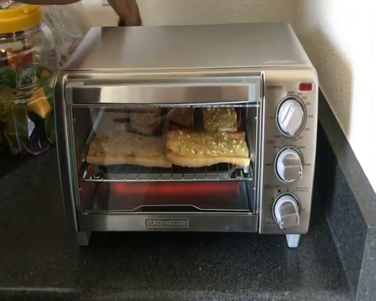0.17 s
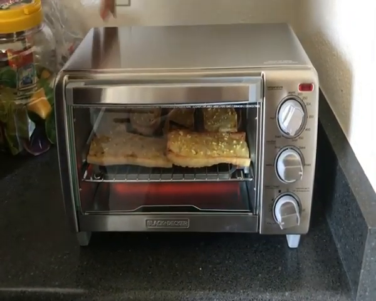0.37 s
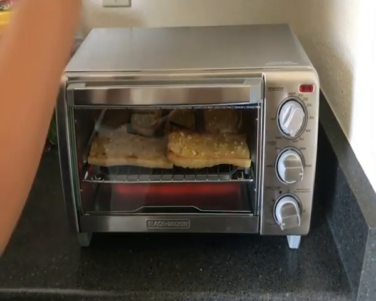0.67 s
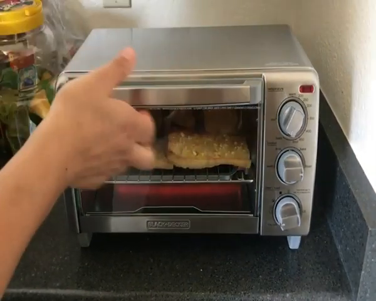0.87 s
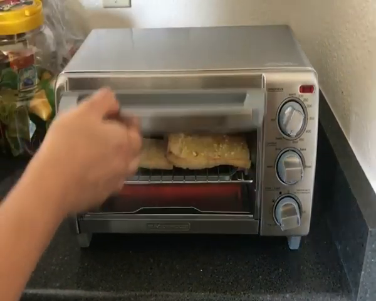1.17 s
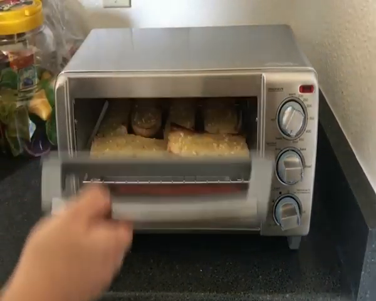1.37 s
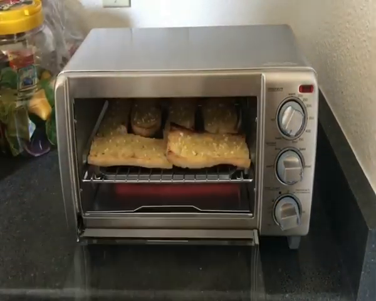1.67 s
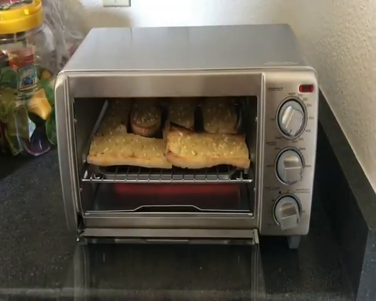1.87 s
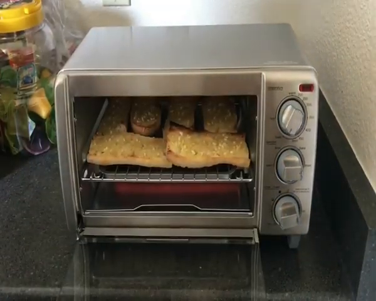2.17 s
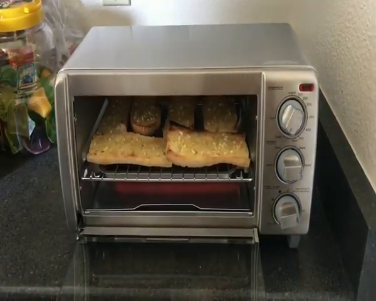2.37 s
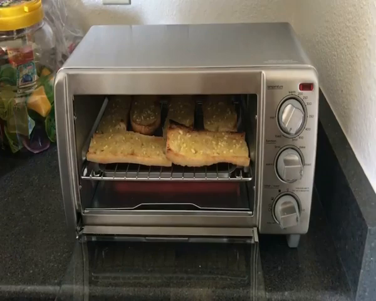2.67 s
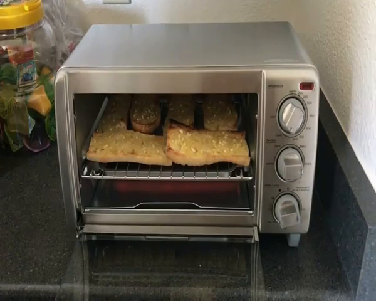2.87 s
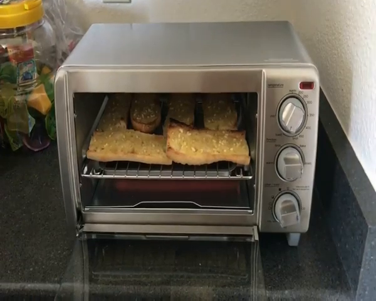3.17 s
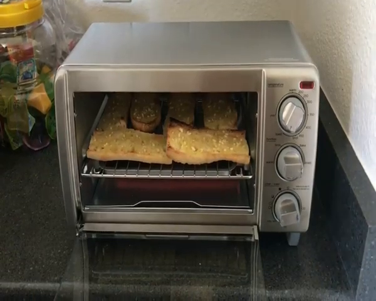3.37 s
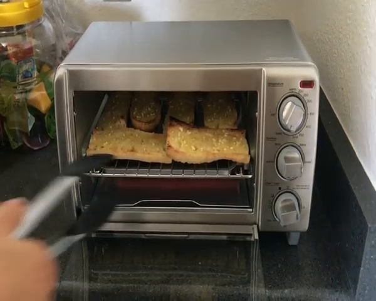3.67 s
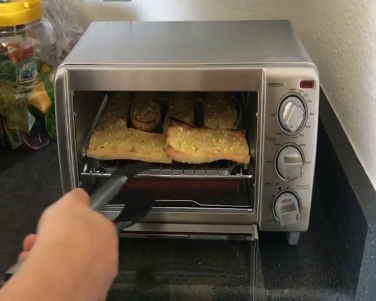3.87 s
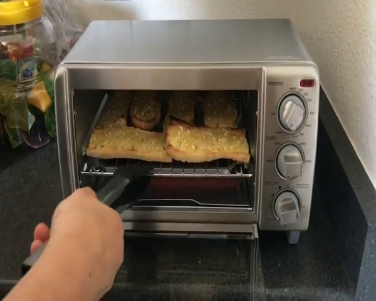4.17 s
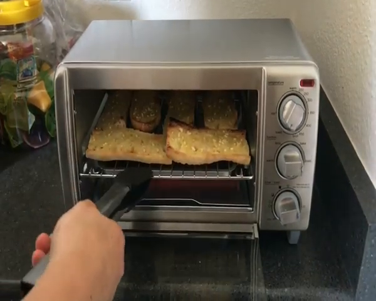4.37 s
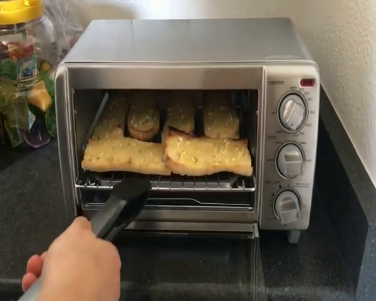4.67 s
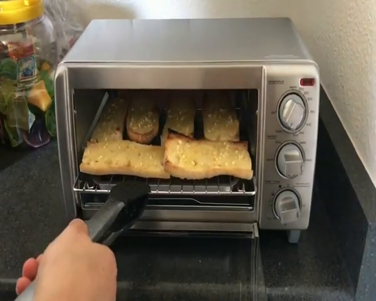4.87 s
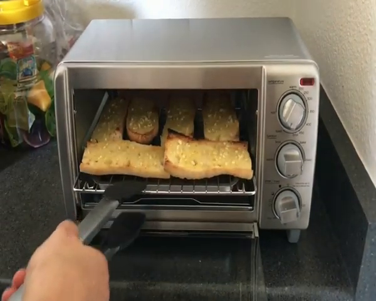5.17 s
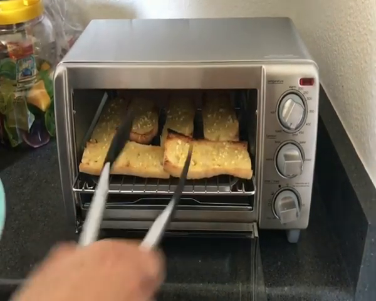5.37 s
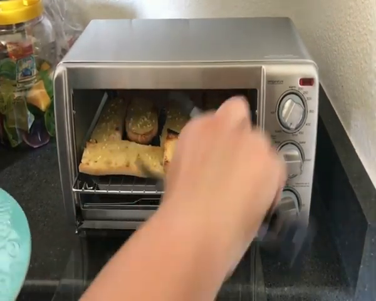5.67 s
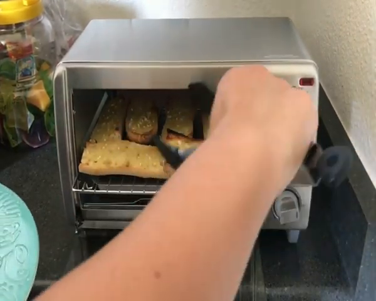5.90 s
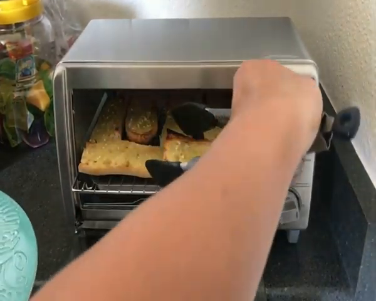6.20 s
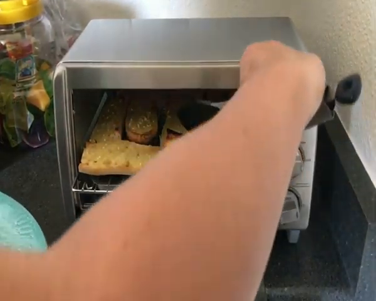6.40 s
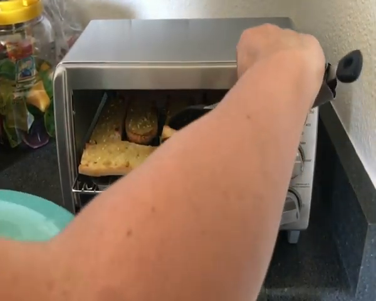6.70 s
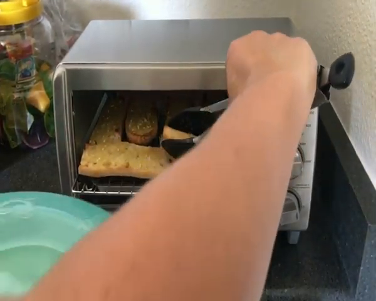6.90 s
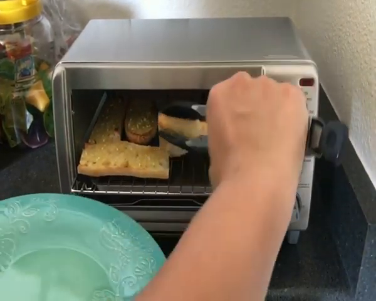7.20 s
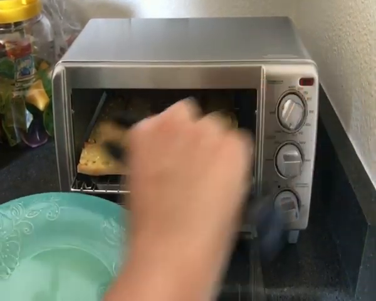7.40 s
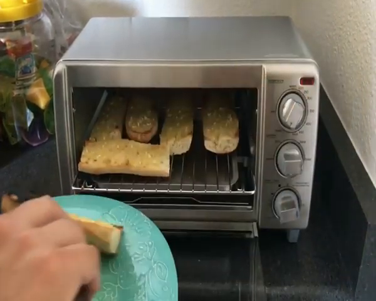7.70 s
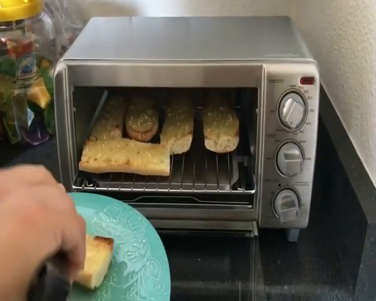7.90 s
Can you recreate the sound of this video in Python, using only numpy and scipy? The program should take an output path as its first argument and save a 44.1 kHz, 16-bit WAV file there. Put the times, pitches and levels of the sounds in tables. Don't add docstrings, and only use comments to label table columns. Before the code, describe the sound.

A loud plug clack on sheet metal, a rattling oven door drop, plate clatter, then tongs scraping a squealing wire rack over a fridge drone.

```python
import sys
import numpy as np
from scipy import signal
from scipy.fft import rfft, irfft, next_fast_len
from scipy.io import wavfile
from scipy.ndimage import uniform_filter1d, map_coordinates

SR = 44100
rng = np.random.default_rng(int(sys.argv[2]) if len(sys.argv) > 2 else 0)


def level_to_linear(level):
    exponent = np.asarray(level, float) / 20
    return 10 ** exponent


def int16_out(signal):
    q = np.round(np.clip(np.atleast_2d(signal).T, -1, 1) * 32767)
    wavfile.write(sys.argv[1], SR, q.astype(np.int16))


N = 354828
SIZE = 2 ** 15


def unit(x):
    return x / np.sqrt(np.mean(x ** 2) + 1e-20)


def along(points, hz):
    f, v = np.transpose(points)
    return np.interp(np.log(hz + 1), np.log(f + 1), v)


def wobble(rate_hz):
    return map_coordinates(rng.standard_normal(int(N * rate_hz / SR) + 4), [np.arange(N) * rate_hz / SR])


def coloured(x, gain):
    m = next_fast_len(N + 8192)
    return unit(irfft(rfft(x, m) * gain(np.fft.rfftfreq(m, 1 / SR)), m)[:N])


def noise_like(x, colour):
    return coloured(x, lambda hz: level_to_linear(along(colour, hz)))


def causal(level_db):
    cep = irfft(np.log(level_to_linear(level_db) + 1e-6))
    cep[1:len(cep) // 2] *= 2
    cep[len(cep) // 2 + 1:] = 0
    return np.exp(rfft(cep))


def phase_walk(t, speed):
    steps = rng.standard_normal(len(t) // 64)
    return np.interp(t, t[::64], speed * np.sqrt(64 / SR) * np.cumsum(steps))


def swells(rows, grows):
    t = np.arange(0, N, 128) / SR
    gains = 0
    for s, rise, fall, db in rows:
        speed = np.interp(t, [s - abs(rise), s, s + abs(fall)], [0, 1, 0])
        gains = gains + level_to_linear(db) * speed ** grows
    return np.interp(np.arange(N) / SR, t, gains)


# f/Hz, t60/s
KITCHEN = [(150, 0.36), (1200, 0.29), (3500, 0.24), (8000, 0.21), (15000, 0.086)]


def echo():
    hz, t, z = signal.stft(rng.standard_normal(SIZE // 2), SR, nperseg=256)
    tail = signal.istft(z * level_to_linear(-60 * t / along(KITCHEN, hz)[:, None]), SR, nperseg=256)[1]
    return rfft(np.pad(tail / np.linalg.norm(tail), (200, 0)), SIZE)


def struck(events, colour, modes, usual_db, gain_db, ring_db, room_db):
    out, t, hz = np.zeros(N + SIZE), np.arange(SIZE // 2) / SR, np.fft.rfftfreq(SIZE, 1 / SR)
    for s, db, treble_db, t60, own_db in events:
        tilt = 0.44 * (treble_db - usual_db) * np.log2(1 + (hz / 2500) ** 2)
        chatter = level_to_linear(-60 * t / max(t60, .002)) * rng.standard_normal(len(t))
        chatter *= (1 - np.exp(-t / 0.00096)) * (0.19 + rng.exponential(1, len(t)))
        chatter = rfft(chatter, SIZE)
        own = 10 * np.log10(np.abs(uniform_filter1d(np.abs(chatter) ** 2, size=400)) + 1e-9)
        blow = irfft(chatter * causal(along(colour, hz) + tilt - own + own.mean()))
        blow = blow / np.abs(blow).max()
        ring = np.zeros(len(t))
        for f, level, life in modes:
            fade = level_to_linear(level + rng.normal(0, 2.1) - 60 * t / life)
            ring += fade * np.sin(2 * np.pi * f * t + np.sqrt(f / 1000) * phase_walk(t, 6))
        blow[:len(t)] += level_to_linear(ring_db + own_db) * ring * (1 - np.exp(-t / 0.0023))
        walls = irfft(rfft(blow) * echo())
        out[round(s * SR):][:SIZE] += level_to_linear(db + gain_db) * (blow + level_to_linear(room_db) * walls)
    return out[:N]


CLACK = [
    (0.568, -20.5, -28, 0.029, -3),
    (0.5838, -0.95, -31, 0.0076, 8.5),
    (0.593, -9.5, -26, .005, 0),
    (0.5995, -8, -21, 0.02, -5),
    (0.6145, -8, -15, 0.0098, -6),
    (0.624, -16, -27, 0.01, -13),
    (0.638, -15.5, -29, 0.012, -5),
    (0.647, -20, -30, .015, -6),
    (0.839, -28.5, -43, 0.027, -1),
]
SNAP = [
    (.5675, -33, -4, 0.038, 0),
    (.5838, -28.5, -4.5, 0.055, 0),
    (.6002, -16, 1.5, .03, 0),
    (.6035, -21, 6.5, 0.062, 0),
]
CASE = [(50, -37), (95, -30), (135, -2), (200, -18), (294, 2.5), (450, -15.5), (667, -9.5), (1000, -2),
        (1400, -0.5), (1900, -5.5), (2400, -17.5), (4200, -26), (10300, -60), (15500, -56.5)]
CLACK_RING = [(129.4, -11.5, 0.2), (254, -15, 0.21), (299, -5, 0.13), (353, -9, 0.26), (560, -14, 0.27),
              (680, 0, 0.063), (729, -8, 0.21), (877, 2.5, 0.089), (965, 2, 0.074), (1031, -4, 0.062),
              (1334, -1.5, 0.17), (1369, 7, 0.067), (1735, -11, 0.06), (2100, -6, 0.05),
              (950, 1, 0.026), (1040, 4, 0.072), (1120, -4, 0.068), (1270, -6, 0.064), (1550, -4, 0.096),
             (1730, -9, 0.06), (1860, 2.5, 0.05), (2154, -7.5, 0.09), (2760, -23, 0.037)]
PRONG = [(1500, -34.5), (2300, -0.5), (2800, 1.5), (4000, -3), (6500, -9), (9500, -11), (10800, -22),
         (12500, -8), (15500, -18)]


def plug():
    body = struck(CLACK, CASE, CLACK_RING, usual_db=-10.5, gain_db=0.6, ring_db=-21.0, room_db=-12.5)
    return body + struck(SNAP, PRONG, [], usual_db=4.5, gain_db=2.0, ring_db=-30, room_db=-8.5)


DOOR = [(.0682, -41, -21, 0.041, 10), (1.3695, -51.5, -9.5, 0.02, -5), (1.5933, -50, -10, 0.0251, -4),
        (1.8507, -40, -16.5, .05, -6), (1.8954, -12, -15.5, 0.012, 2), (1.899, -20, -20, 0.02, -2),
        (1.9065, -25, -17.5, 0.013, -6), (1.9135, -28, -8, 0.015, -2), (1.921, -34, -10.5, .02, 0),
        (1.9555, -27, -2.5, 0.12, -3), (2.0225, -34.5, 4, 0.058, -8), (2.0482, -21, -15, 0.037, 10),
        (2.061, -37.5, -3, 0.024, -4), (2.1188, -30.5, -1, 0.071, -13), (2.2181, -44, 1.5, .04, -8)]
KNOCK = [
    (1.906, -23.5, -6, 0.011, -3),
    (1.913, -31, -10, 0.019, 0),
    (1.953, -26, -12, 0.017, 2),
    (1.967, -26, -10, 0.018, -1),
    (1.985, -34, -8, 0.026, -3),
    (2.062, -27, -10, 0.024, 1.5),
    (2.085, -35, -10, 0.027, -1),
    (2.114, -31, -10, 0.028, -5),
    (2.152, -29, -7, 0.021, 1),
    (2.175, -30.5, -9, 0.022, -6),
]
CREAK = [
    (.077, -37, -3, .03, 2.5),
    (1.6462, -48, -2, .02, -6),
    (1.732, -42.5, -5, 0.022, -6),
]
PIN = [
    (.0973, -34.5, -1, 0.037, -8),
    (2.1497, -32.5, -4, 0.024, -8),
    (6.6858, -40.5, -11, .02, -2),
    (6.7035, -37, -10, 0.03, 3),
]
GLASS = [(88, -13.5), (200, -8.5), (420, -19), (1200, -12), (1900, -14.5), (2600, -3), (3500, -5.5),
         (4700, -9.5), (5800, -3.5), (8000, -10.5), (15500, -23)]
GLASS_RING = [(251, -13.5, 0.138), (338, -10.5, 0.2), (400, -16, 0.15), (2450, 1, 0.02), (2940, -14, 0.025),
              (3160, -18.5, .03), (3400, -2.5, 0.021), (4380, -6, 0.025), (5490, -8, 0.03),
              (5850, -7, 0.045)]
STOP_RING = [(143, 0, 0.1), (246, -8, 0.13), (330, -17, 0.12), (403, -3, 0.15), (560, -18, .06),
             (750, 0, 0.047), (1230, -3.5, 0.045)]
SPRING_RING = [(2108, 0, 0.06), (2600, -3, 0.055), (2860, -11.5, 0.23), (3660, -8, 0.046)]
PIN_RING = [(2850, -1, 0.04), (3130, -10, 0.031), (3270, 7, 0.025), (3710, -4, 0.028)]
COUNTER = [(60, -39.5), (190, 15), (400, 1), (760, -5), (1100, -29), (1500, -28), (4000, -23), (9000, -53)]


def door():
    return (struck(DOOR, GLASS, GLASS_RING, usual_db=-15.5, gain_db=4.0, ring_db=-17.0, room_db=-8.5)
            + struck(KNOCK, COUNTER, STOP_RING, usual_db=2, gain_db=-8, ring_db=-4.5, room_db=-8.5)
            + struck(CREAK, GLASS, SPRING_RING, usual_db=4.0, gain_db=1.5, ring_db=-10.0, room_db=-5.5)
            + struck(PIN, GLASS, PIN_RING, usual_db=2.0, gain_db=2.5, ring_db=-4.0, room_db=-8))


PLATE = [
    (3.081, -35.5, -12, 0.055, -2.5),
    (7.8112, -36, -9.5, 0.028, 2),
    (7.9106, -44, -16, 0.011, 1),
    (7.9573, -45.5, -4, .02, -8),
    (7.9775, -19.5, -22, 0.011, -1),
    (8.0084, -36, -6, 0.0122, -16),
    (8.0394, -38, -6.5, .012, 2),
]
# t/s, peak level/dB
LIFT = [(2.798, -47), (2.8292, -38.5), (2.844, -37), (2.8578, -33), (2.8637, -30.5), (2.872, -32),
        (2.885, -39), (2.899, -40), (2.91, -46.5)]
CHINA = [(200, -12), (500, -10), (1000, -1), (1600, -2.5), (2500, -2.5), (3600, 0), (4400, -18), (5800, -7),
         (9000, -14), (15500, -34)]
CHINA_RING = [(736, -9, 0.25), (1090, -10.5, 0.094), (1500, 1, 0.047), (1910, -3.5, 0.11),
              (2350, -3, 0.064), (2870, -0.5, 0.037), (3670, 2, 0.04), (4500, -5, 0.04), (5360, -4, 0.037),
              (5900, -5.5, 0.062), (8240, -19, .03)]
STACK = [(240, -36.5), (400, -3), (700, -19), (1050, -20), (1500, -11), (2300, -7), (3500, -0.5),
         (4600, -11), (6500, 0), (15500, -44)]
STACK_RING = [(624, 3.5, 0.093), (750, 0.5, 0.091), (1024, -1, 0.15), (1468, 3, 0.05), (1774, -1.5, 0.064),
              (2343, -2.5, 0.047), (4400, -5, 0.042), (5260, -5, 0.057), (5900, -7, .03), (6940, -12, .03)]


def plate():
    lift = [(s, db, -12.5, 0.027, 0) for s, db in LIFT]
    taps = struck(PLATE, CHINA, CHINA_RING, usual_db=-18.0, gain_db=-2.5, ring_db=-11.0, room_db=-9.0)
    return taps + struck(lift, STACK, STACK_RING, usual_db=-6.5, gain_db=-4.5, ring_db=-7.0, room_db=-9.5)


THUD = [
    (3.126, -33.5, -8, 0.047, 5),
    (4.378, -34.5, -13, 0.025, -2),
    (6.735, -34.5, -22, 0.047, -1.5),
    (6.776, -39.5, -18, 0.054, -10),
]
COUNTER_RING = [(223, -6, 0.051), (303, -7, 0.11), (405, 0, 0.082), (573, -4, 0.05), (756, 4.5, 0.1),
                (1105, -12.5, 0.19)]


def thuds():
    return struck(THUD, COUNTER, COUNTER_RING, usual_db=-1.5, gain_db=2.0, ring_db=-8.5, room_db=-3.5)


TONGS = [
    (3.7073, -44.5, -14, .023, -2),
    (3.7675, -42, -11, 0.01, -7),
    (4.3774, -24, -20, 0.02, 11),
    (4.3803, -26.5, -19, .02, 16.5),
    (4.3872, -27, -10.5, 0.039, -4),
    (4.4091, -31.5, -5, 0.028, 6),
    (4.4233, -46, -35, 0.022, 1),
    (6.747, -29.5, -13, 0.028, -11),
    (6.826, -41, -16, 0.022, -2),
]
WIRE = [(300, -42.5), (700, -25), (1200, -7), (1600, 1), (2300, -7.5), (3050, 8), (3800, -1.5), (5500, -5),
        (8000, -8.5), (15500, -26)]
WIRE_RING = [(1128, -2.5, 0.073), (1190, 4, 0.1), (1474, 3.5, 0.097), (1520, -1, 0.083), (2510, -2, 0.059),
             (2820, 7, 0.026), (3170, 9, 0.017), (3170, -14.5, 0.028), (5570, -20, .03), (8000, -15, 0.039)]


def tongs():
    return struck(TONGS, WIRE, WIRE_RING, usual_db=-16.5, gain_db=-1.0, ring_db=-28.5, room_db=-6.0)


# t/s, peak level/dB, treble/dB
CRUST = [(3.4501, -46, -14), (4.1664, -47, -7), (4.347, -37.5, -8), (4.396, -32, -15), (4.431, -38, -6),
         (4.9576, -51, -21), (5.562, -48, -11), (6.644, -44, -17.5), (6.686, -40, -10), (6.694, -33, -11),
         (6.705, -32, -12), (6.732, -24.5, -9.5), (6.7369, -30, -9), (6.757, -25.5, -11.5),
         (6.764, -29, -17), (6.773, -34, -7), (6.784, -35.5, -12), (6.809, -43, -16), (6.848, -42.5, -22),
         (6.8823, -37, -7), (6.9687, -41, -8), (7.029, -42.5, -15.5), (7.1547, -43, -14),
         (7.2776, -53, -15)]
# t/s, peak level/dB, treble/dB
GRAZE = [(1.891, -24, -12), (4.374, -32, -21), (4.503, -33, 1), (4.588, -38, -2), (4.601, -37, 7.5),
         (4.62, -36, 5.5), (4.6326, -41, -16), (4.6467, -37, -1), (4.665, -38.5, -3), (4.686, -39, 5),
         (4.705, -44, -8), (4.752, -45, -12), (4.775, -46, -4), (7.926, -41, -13)]
CRUMB = [(500, -39.5), (1500, -2), (3000, 3.5), (6000, -2.5), (10000, -7), (15500, -13)]


def light_touches():
    crust = [(s, db, treble_db, 0.032, 0) for s, db, treble_db in CRUST]
    graze = [(s, db, treble_db, .16 * level_to_linear(0.62 * db), 0) for s, db, treble_db in GRAZE]
    return struck(crust + graze, CRUMB, [], usual_db=-16.0, gain_db=-0.5, ring_db=-30, room_db=-1.5)


# fastest t/s, speeding up/s, slowing down/s, body level/dB, grit over body/dB
STROKES = [(.003, 0.01, 0.22, -43.5, -16.5), (1.42, 0.15, 0.4, -63, -10), (1.84, 0.99, 0.058, -58, -9.5),
           (1.89, 0.05, 0.62, -42.5, -16.5), (2.035, 0.057, 0.12, -63, 11), (2.12, 0.031, 0.37, -53.5, 0.5),
           (2.863, 0.15, 0.15, -47.5, -7.5), (3.43, 0.12, 0.053, -59.5, -0.5), (0.929, 0.3, 0.2, -58.5, -7),
           (4.45, 0.04, 0.18, -53, -11), (4.5, 0.053, 0.17, -64.5, 3), (4.56, 0.1, 0.11, -59, -25),
           (4.86, 0.071, 0.11, -55, -20), (4.672, 0.18, 0.23, -45, -14), (4.77, 0.06, 0.42, -52.5, -22),
           (4.965, 0.051, 0.22, -54.5, -19), (6.748, 0.1, 0.25, -42, -10.5), (6.95, 0.054, 0.45, -60, -4.5),
           (7.149, 0.22, 0.057, -70, -1), (7.963, 0.088, 0.05, -52.5, -1)]
# f/Hz, level/dB per Hz
DRAG = [(150, -120), (400, 6.5), (900, 3), (1600, -3), (2300, -5), (3200, -6.5), (4200, -7.5), (5500, -18),
        (9000, -23), (16000, -50.5)]
GRIT = [(3000, -120), (4500, -0.5), (7000, 3.5), (10000, -4), (13500, -5), (16000, -9.5)]


def rubbing():
    body = swells([row[:4] for row in STROKES], grows=2)
    grit = swells([(s, rise, fall, db + over_db) for s, rise, fall, db, over_db in STROKES], grows=2.84)

    def slips(share, size):
        jumps = (rng.random(N) < share) * rng.exponential(1, N)
        return rng.standard_normal(N) * (1 + size * jumps)

    drag = noise_like(slips(0.023, 1.0) * level_to_linear(1.4 * wobble(50)), DRAG)
    fizz = noise_like(slips(0.025, 1.5) * level_to_linear(2.8 * wobble(83)), GRIT)
    return level_to_linear(-3.5) * body * drag + level_to_linear(1.0) * grit * fizz


def squeal(course, gain_db):
    width_hz = 940
    t, (s, hz, db) = np.arange(N) / SR, np.transpose(course)
    slips = rng.standard_normal((2, N)) * (1 + 9 * (rng.random(N) < .004))
    a, b = [coloured(x, lambda f: 1 / (1 + (2 * f / width_hz) ** 2)) for x in slips]
    turn = 2 * np.pi * np.cumsum(np.interp(t, s, hz)) / SR
    fade = np.clip(np.minimum(t - s[0], s[-1] - t) / .03, 0, 1)
    level = level_to_linear(gain_db + np.interp(t, s, db) + 3.0 * wobble(60))
    return level * fade * (a * np.cos(turn) + b * np.sin(turn))


# t/s, f/Hz, level/dB
RUNNER = [(4.56, 1736, -71), (4.652, 1764, -44.5), (4.734, 1700, -55), (4.808, 2050, -64),
          (4.914, 1520, -58), (4.934, 1570, -73), (4.96, 1620, -55), (4.98, 1620, -62)]
RUNNER_UPPER = [(4.6, 2640, -58), (4.646, 2660, -55), (4.684, 2570, -54.5), (4.74, 2684, -51),
                (4.744, 2600, -60), (4.9, 2720, -66)]
HINGE = [(1.3, 3290, -79), (1.44, 3010, -68), (1.53, 3930, -68), (1.66, 3680, -66.5), (1.8, 2310, -78)]


def squeals():
    return squeal(RUNNER, gain_db=-4) + squeal(RUNNER_UPPER, gain_db=-3.0) + squeal(HINGE, gain_db=-0.5)


# t/s, f/Hz, peak level/dB, t60/s
TINK = [(.098, 3520, -39, .03), (.1025, 3420, -36, 0.017), (.103, 2430, -42, 0.027),
        (1.6462, 2600, -54, .08), (1.6462, 4010, -48.5, .05), (1.732, 2210, -48, 0.055),
        (1.879, 2950, -41, .02), (2.829, 4600, -54, 0.066), (2.866, 4520, -46, 0.066),
        (2.866, 5240, -55, 0.052), (2.906, 4600, -54, .05), (4.368, 2500, -39, .02),
        (4.376, 3130, -28.5, 0.037), (4.743, 2650, -45, .06), (4.795, 2600, -55, 0.044),
        (6.689, 3030, -36.5, 0.062), (6.722, 2020, -41, .04), (6.747, 2770, -35, .03),
        (6.759, 5500, -35, .03), (6.772, 6360, -35, .025), (3.767, 5250, -45, .03),
        (7.815, 3670, -50, 0.034), (7.957, 5630, -43, 0.046), (7.962, 4600, -47, 0.028),
        (8.037, 4600, -45, .04)]


def tinks():
    out, t = np.zeros(N + SIZE), np.arange(SIZE // 4) / SR
    for s, hz, db, t60 in TINK:
        tone = np.sin(2 * np.pi * hz * t + phase_walk(t, 12))
        fade = level_to_linear(db - 60 * t / max(t60, .005)) * (1 - np.exp(-t / 0.0011))
        out[round(s * SR):][:SIZE] += irfft(rfft(fade * tone, SIZE) * (1 + level_to_linear(-6.0) * echo()))
    return out[:N]


# peak t/s, rise/s, fall/s, level/dB
BUMP = [
    (1.904, 0.064, 0.35, -39.5),
    (2.15, 0.12, 0.249, -34.5),
    (6.78, 0.13, 0.23, -34),
]
JOLT = [
    (.1, 0.028, 0.035, -34.5),
]
# f/Hz, level/dB per Hz
BOOM = [(30, -120), (55, 11), (120, -11.5), (260, 13), (420, -7), (900, -33)]


def counter():
    shake = swells(BUMP, grows=1.2) * noise_like(rng.standard_normal(N), BOOM)
    jolt = np.sqrt(2) * swells(JOLT, grows=1.2) * np.sin(2 * np.pi * 72 * np.arange(N) / SR)
    return level_to_linear(-10.0) * shake + jolt


# t/s, level/dB
HISS = [(0, -67.5), (.41, -87), (.82, -68), (1.34, -80.5), (1.71, -69), (4.301, -74.5), (4.58, -63),
        (4.95, -72.5), (6.9, -77.5), (7.7, -74), (8.046, -65.5)]
# f/Hz, level/dB per Hz
SIZZLE = [(4000, -120), (7000, -7.5), (9500, -1), (10400, -6), (12500, 0.5), (15500, -4.5)]


def sizzle():
    noise = rng.standard_normal(N) * level_to_linear(1.1 * wobble(11))
    level_db = 2.5 + np.interp(np.arange(N) / SR, *np.transpose(HISS))
    return level_to_linear(level_db) * noise_like(noise, SIZZLE)


# f/Hz, rms level/dB
HUM = [(59.3, -57.5), (109, -57.5), (307, -55.5)]
# f/Hz, width/Hz, rms level/dB
DRONE = [(59.3, 6, -67), (109.4, 11, -57.5), (189.2, 14, -59), (230.2, 13, -59.5), (300.9, 19, -57),
         (331.4, 3.3, -62), (358, 84, -63), (592.6, 27, -59), (883, 49, -62), (1345, 51, -73.5),
         (5561, 16, -81.5)]
# f/Hz, level/dB per Hz
AIR = [(15, -56), (25, -17), (48, -15.5), (80, -5.5), (114, -6.5), (137, -10.5), (185, 3.5), (263, -10.5),
       (301, 0), (335, -18.5), (591, -11), (1040, -21.5), (3250, -34), (5730, -33.5), (16000, -41)]


def refrigerator():
    t = np.arange(N) / SR
    tones, bands = np.zeros(N), np.zeros(N)
    for hz, db in HUM:
        level = np.sqrt(2) * level_to_linear(db + 1.1 * wobble(2.856))
        tones += level * np.sin(2 * np.pi * hz * t + 0.58 * wobble(2.22))
    for centre, width, db in DRONE:
        band = coloured(rng.standard_normal(N), lambda hz: 1 / (1 + (2 * (hz - centre) / width) ** 2))
        bands += level_to_linear(db + 1.8 * wobble(4.4)) * band
    drift = level_to_linear(.4 * wobble(1.5) + .4 * wobble(8))
    air = coloured(rng.standard_normal(N), lambda hz: level_to_linear(along(AIR, hz)) / (1 + (hz / 9000) ** 4))
    return tones + bands * level_to_linear(0.446 * wobble(3.7)) + level_to_linear(-43 - 5.5) * drift * air


def scene():
    handled = plug() + door() + plate() + thuds() + tongs() + light_touches()
    moving = rubbing() + squeals() + tinks() + counter()
    mono = handled + moving + sizzle() + refrigerator()
    return np.array([mono, mono])


# f/Hz, side minus mid/dB
SPREAD = [(60, -77), (110, -73), (200, -76.5), (380, -45), (700, -41), (1290, -24.5), (2380, -27),
          (4400, -23), (8120, -25.5), (15000, -23)]


def faint_side(mid):
    m = next_fast_len(N + 8192)
    hz = np.fft.rfftfreq(m, 1 / SR)
    eased = mid * level_to_linear(2.0 * wobble(9)) / (1 + 150 * uniform_filter1d(np.abs(mid), size=1024))
    gain = level_to_linear(along(SPREAD, hz) + 12.5 - 5.7 * (hz < 1800))
    return irfft(rfft(np.roll(eased, 40), m) * gain, m)[:N]


# f/Hz, rarity/sigma
GAPS = [(3500, 2.3), (4800, 1.1), (6000, 1.7), (7200, 1.1), (9000, 1.4), (10400, .5), (12000, 1.0),
        (15000, .6)]


def dropouts(x):
    hz, t, z = signal.stft(x, SR, nperseg=1024)
    field = uniform_filter1d(rng.standard_normal(z.shape[1:]), size=5, axis=0)
    field = unit(uniform_filter1d(field, size=6, axis=1))
    stripes = unit(uniform_filter1d(rng.standard_normal(len(t)), size=3))
    share = np.clip((hz[:, None] - 7000) / 4000, 0, .8)
    field = np.sqrt(1 - share ** 2) * field + share * stripes
    treble = np.abs(z[0, hz > 8000]).mean(axis=0)
    loud = treble > 2 * np.median(treble)
    keep = (field < along(GAPS, hz)[:, None]) | loud | (hz[:, None] < 3500)
    return signal.istft(z * keep, SR, nperseg=1024)[1][:, :N]


def top_cut(x):
    return signal.sosfilt(signal.butter(12, 16480, fs=SR, output="sos"), x)


def record(dry):
    side = faint_side(dry[0])
    x = dropouts(dry) + np.array([side, -side])
    x = x / (1 + np.abs(x / 1.02) ** 16) ** (1 / 16)
    m, top_hz = next_fast_len(N + 8192), 15830
    x = irfft(rfft(x, m) * (np.fft.rfftfreq(m, 1 / SR) < top_hz), m)[:, :N]
    return top_cut(x)


dry = scene()
out = record(dry)
int16_out(out)
```